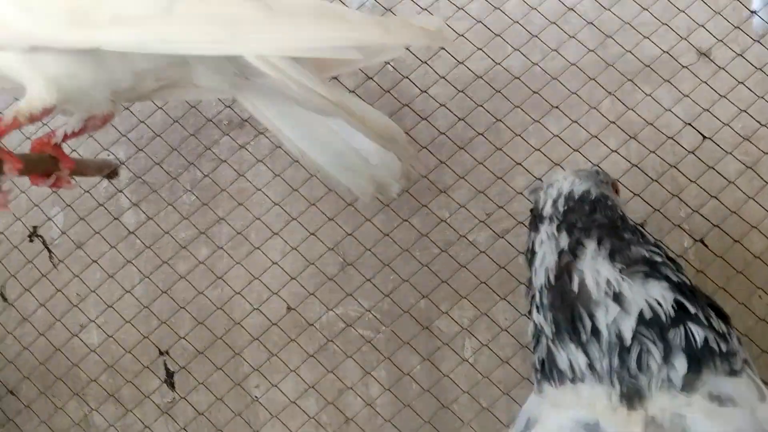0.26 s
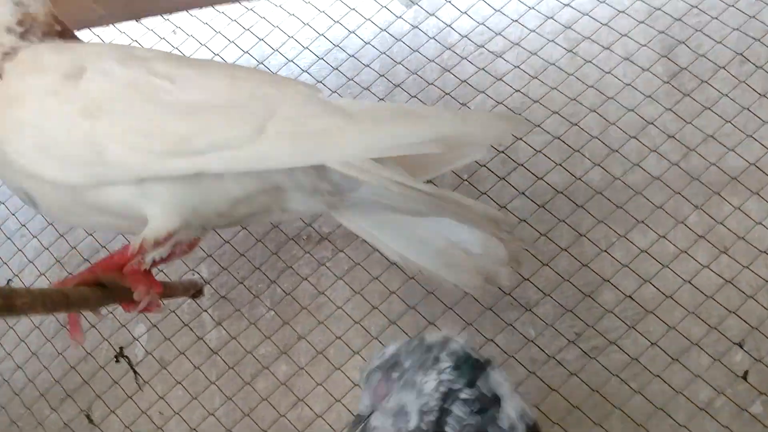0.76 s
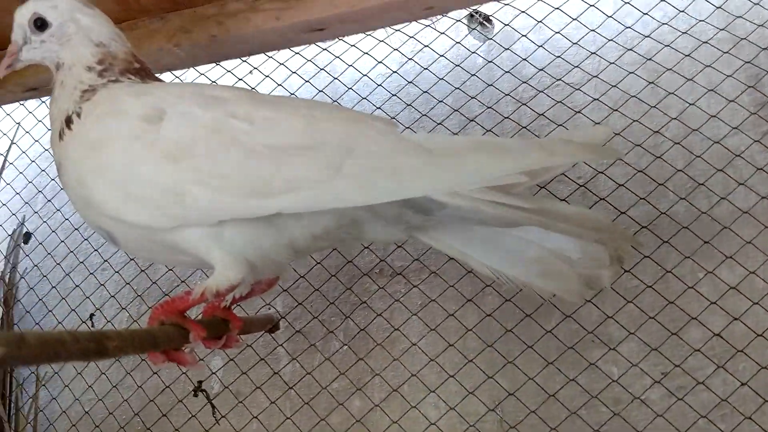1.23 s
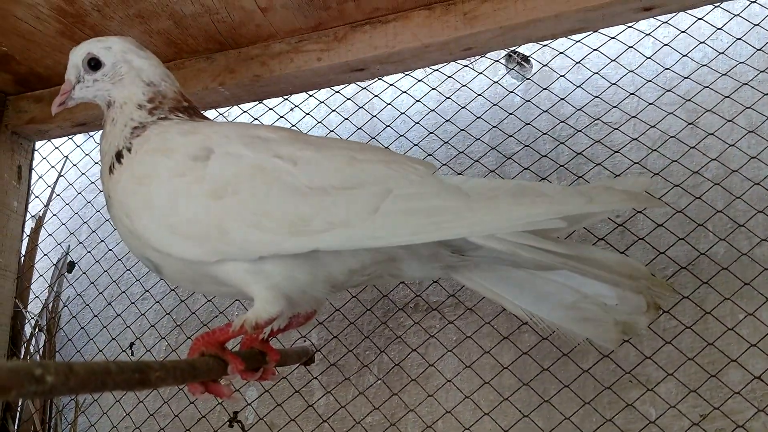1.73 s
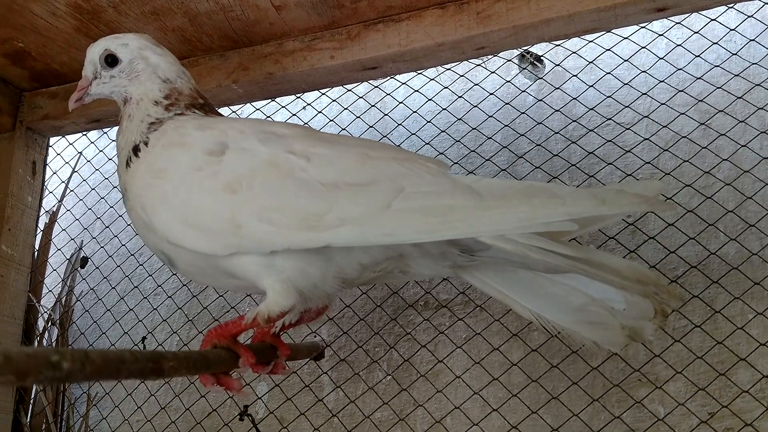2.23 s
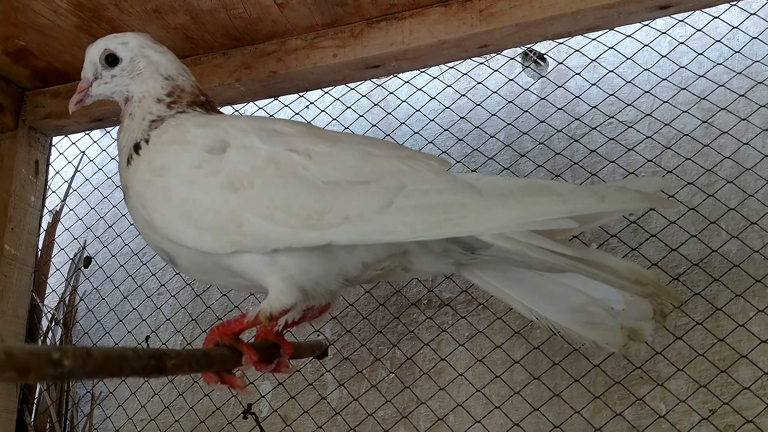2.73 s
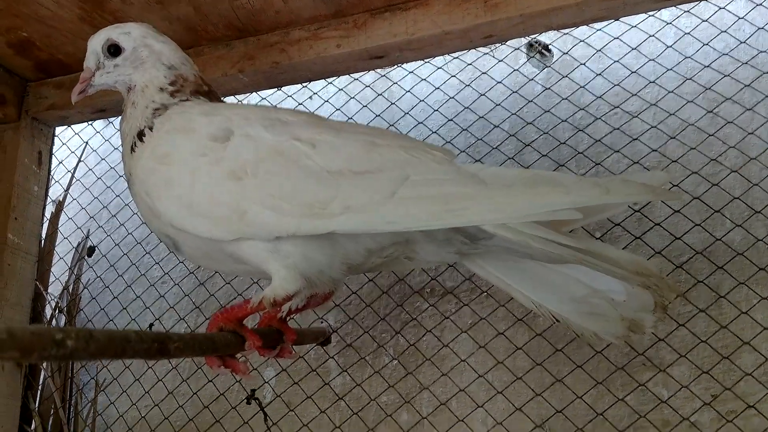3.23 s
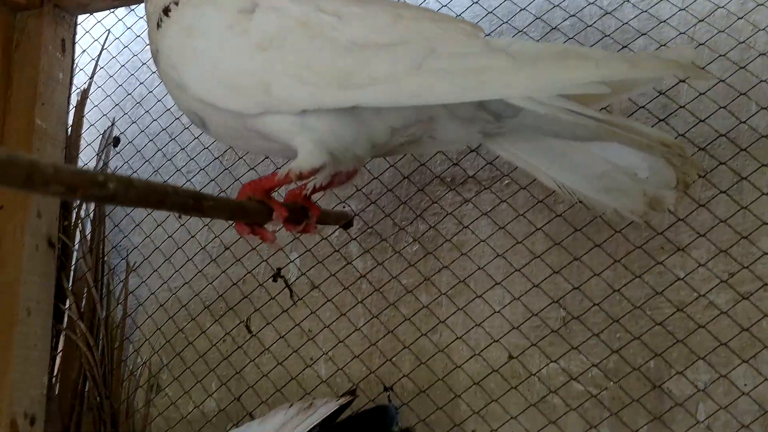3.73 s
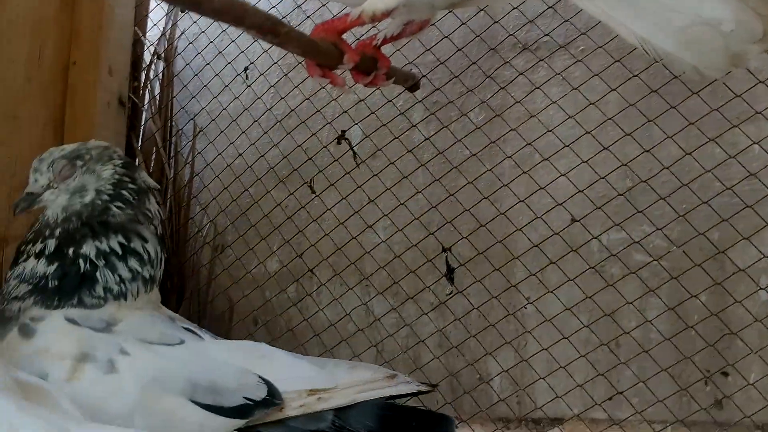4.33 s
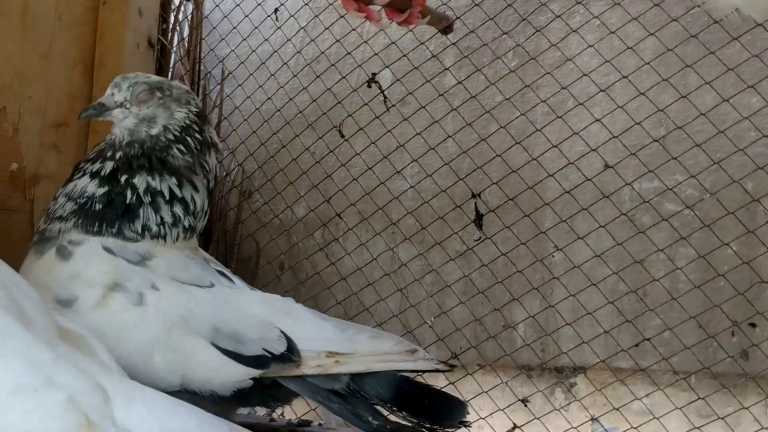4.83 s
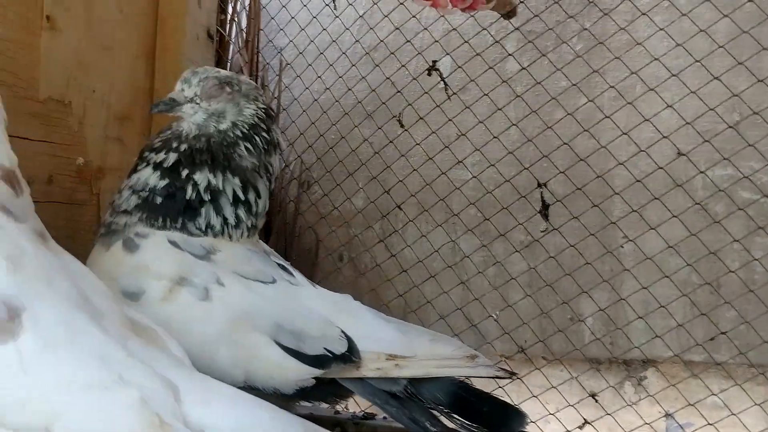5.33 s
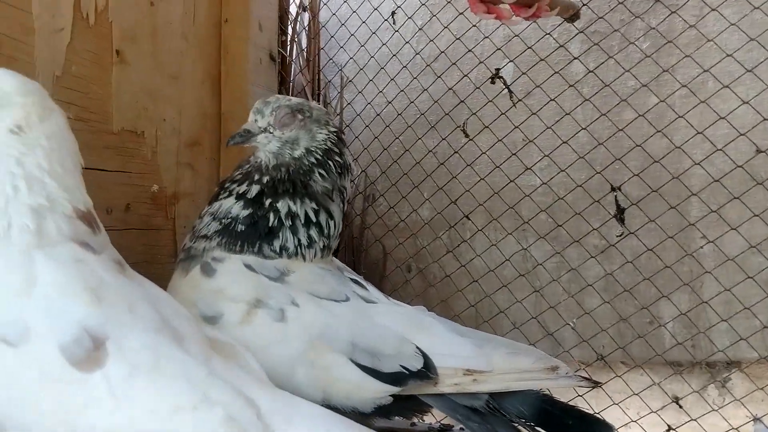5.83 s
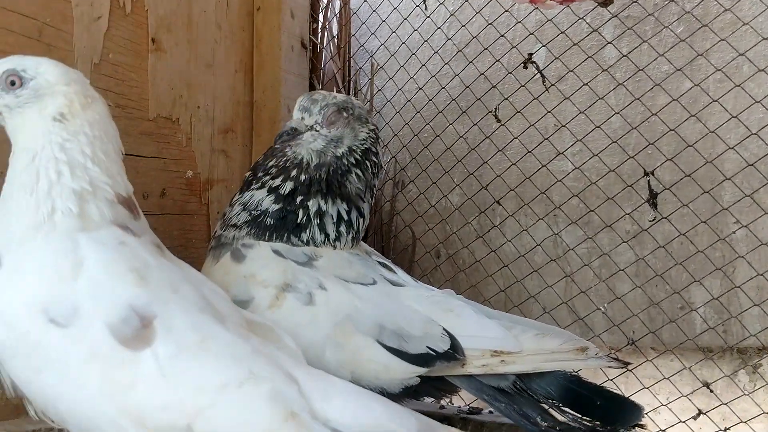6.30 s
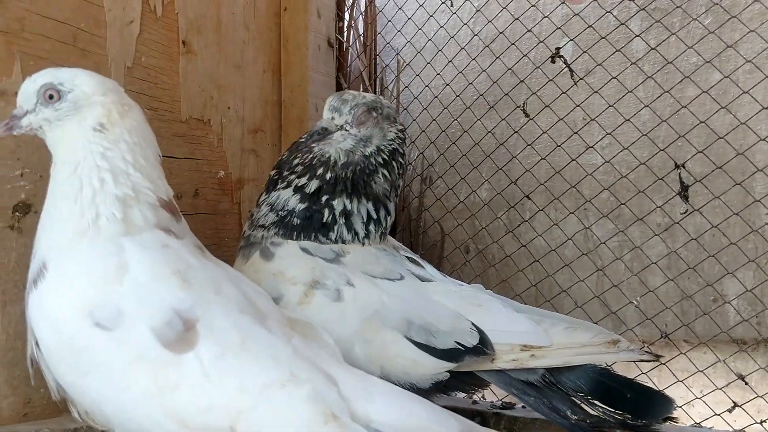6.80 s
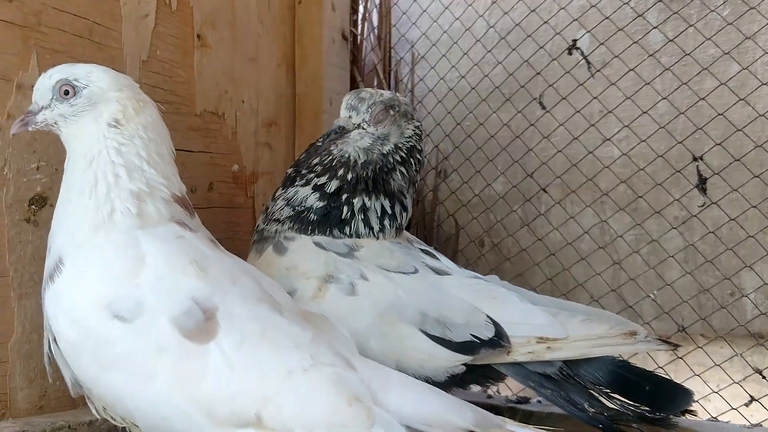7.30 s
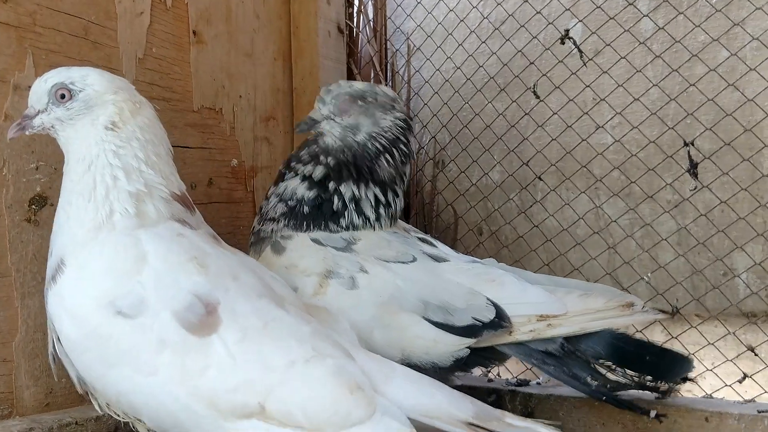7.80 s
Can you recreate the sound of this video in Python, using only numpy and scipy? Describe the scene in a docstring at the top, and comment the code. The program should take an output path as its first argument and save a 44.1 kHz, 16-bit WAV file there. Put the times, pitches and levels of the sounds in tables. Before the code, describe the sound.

Inside a small wooden loft, close to the birds. From 0 to 0.4 s low rasps and small throaty notes mix with brushing feathers and a click. A sharp wooden knock lands at 0.5 s and another at 0.8 s, with foot scuffs between. Small birds outside twitter in quick falling phrases, clearest from 0.8 to 2.1 s. Purrs at 1 to 1.25 s lead to climbing hoots from 1.4 s and a rolling coo at 1.8 s. Growls and a duller knock follow around 2.2 s, then louder hoots at 2.45 s and a coo at 2.9 s. More growls, hoots at 3.7 s and a last coo at 4.05 s end in a rasp. Then quiet low rumble and faint distant cheeps, a weak purr at 5.8 s, slight rustling near 7 s, a knock at 7.6 s and a short rasp at 7.9 s.

```python
"""Pigeons courting in a loft

Pigeons court close by in a wire-mesh loft. Drawn-out coos and short hoots are sums of harmonics
shaped by the throat; rattling growls are pulse trains that ring the crop and the beak.
Feathers brush as grainy filtered noise, and feet tick, scuff and knock as noise bursts and board modes.
Small birds twitter farther off in gliding sines, over an outdoor rumble of filtered noise and a low hum."""
import sys
import numpy as np
from scipy import signal
from scipy.fft import rfft, irfft, next_fast_len
from scipy.io import wavfile
from scipy.ndimage import map_coordinates

SR = 44100
rng = np.random.default_rng(int(sys.argv[2]) if len(sys.argv) > 2 else 0)


def int16_out(signal):
    """Quantize to a 16-bit WAV file."""
    q = np.round(np.clip(np.atleast_2d(signal).T, -1, 1) * 32767)
    wavfile.write(sys.argv[1], SR, q.astype(np.int16))


N = 355357  # length in samples


def amp(db):
    """Logarithmic level: decibels become an amplitude ratio."""
    return 10 ** (np.asarray(db) / 20)


def unit(x):
    """Normalization: scale to an rms of 1."""
    return x / np.sqrt(np.mean(x ** 2) + 1e-20)


def along(points, hz):
    """Spectral interpolation: read (Hz, value) points on a logarithmic frequency axis."""
    point_hz, values = np.transpose(points)
    return np.interp(np.log(hz + 1), np.log(point_hz + 1), values)


def clock(length):
    """Sampling: the sample times of a sound of this length, in seconds."""
    return np.arange(int(length * SR)) / SR


def add(track, start, sound):
    """Superposition: mix a sound into the track at a start time in seconds."""
    room = track[max(round(start * SR), 0):][:len(sound)]
    room += sound[:len(room)]


def wobble(rate, size=N):
    """Band-limited fluctuation: a smooth random curve with this many knots a second."""
    knots = rng.standard_normal(int(size * rate / SR) + 4)
    return map_coordinates(knots, [np.arange(size) * rate / SR])


def filtered(x, response):
    """Linear filtering: multiply the spectrum by a complex response of frequency."""
    size = next_fast_len(N + SR // 2)
    spectrum = rfft(x, size) * response(np.fft.rfftfreq(size, 1 / SR))
    return irfft(spectrum, size)[..., :N]


def coloured(x, spectrum, size=8192):
    """Minimum-phase resonance: ring x through a causal filter of unit energy."""
    cepstrum = irfft(np.log(amp(along(spectrum, np.fft.rfftfreq(size, 1 / SR)))))
    # folding the cepstrum onto positive times makes the filter causal
    cepstrum[1:size // 2] *= 2
    cepstrum[size // 2 + 1:] = 0
    ring = irfft(np.exp(rfft(cepstrum)))
    return signal.oaconvolve(x, ring / np.linalg.norm(ring))[:N]


def echo(x, decay):
    """Diffuse reverberation: convolve with a noise tail in which each frequency dies at its own speed."""
    hz, t, bins = signal.stft(rng.standard_normal(SR // 2), SR, nperseg=256)
    fading = bins * amp(-60 * t / along(decay, hz)[:, None])
    tail = signal.istft(fading, SR, nperseg=256)[1]
    return signal.oaconvolve(x, tail / np.linalg.norm(tail))[:N]


def cycles(hz):
    """Phase accumulation: integrate a pitch curve into radians."""
    return 2 * np.pi * np.cumsum(hz) / SR


def slur(length, start_hz, end_hz, waver):
    """Frequency glide: a whistled sine slides fast at first, then settles."""
    u = clock(length) / length
    hz = end_hz + (start_hz - end_hz) * (1 - u) ** 2
    hz = hz * (1 + waver * wobble(400, size=len(u)))
    return np.sqrt(2 * np.sin(np.pi * u)) * np.sin(cycles(hz))


# Held coos, one table each. Each row: time in seconds, pitch in Hz, relative levels of the
# fundamental and of the octave in dB.
COO_CURVES = [
    [(1.815, 235.5, -46, -42.5), (1.86, 269, -27.5, -30), (1.878, 261.3, -28, -34.5),
     (1.895, 274.5, -25.5, -28), (1.915, 290.7, -27.5, -26.5), (1.933, 279.6, -14, -30.5),
     (1.957, 256.2, -35.5, -31)],
    [(2.908, 275.6, -28.5, -32.5), (2.95, 280.8, -31, -34), (2.99, 304.6, -19.5, -32),
     (3.02, 308.6, -26, -34.5), (3.055, 318, -18.5, -36), (3.084, 293, -22, -30), (3.113, 265, -31.5, -48)],
    [(4.055, 281.3, -30.5, -20), (4.085, 257.4, -31.5, -29), (4.118, 274.7, -26, -23),
     (4.14, 281.2, -23.5, -21), (4.18, 263.6, -29, -29), (4.21, 297.6, -21.5, -19.5),
     (4.232, 284.5, -19.5, -29), (4.258, 247, -23, -26.5)],
]
# Throat resonance. Each row: frequency in Hz, relative harmonic strength in dB.
THROAT_RESONANCE = [(200, 3), (420, -5.5), (570, -3), (660, -7), (780, -43.5), (880, -20.5), (1050, -30),
                    (1300, -43), (2000, -48)]


def coos():
    """Harmonic source and throat resonance: a strong octave; the lower the pitch, the more it rattles."""
    out = np.zeros(N)
    for rows in COO_CURVES:
        times, *columns = np.transpose(rows)
        t = clock(times[-1] - times[0])
        hz, low_db, octave_db = (np.interp(times[0] + t, times, column) for column in columns)
        rough = np.clip((310 - hz) / 45, .3, 1)
        phase = cycles(hz * (1 + .03 * rough * wobble(220, size=len(t))))
        flutter_db = 1.6 * wobble(260, size=len(t)) + 1.8 * np.sin(2 * np.pi * 70 * t)
        rattle = amp(rough * flutter_db)
        voice = amp(low_db + 2.5) * np.sin(phase) + amp(octave_db + 3.0) * np.sin(2 * phase)
        for k in range(3, 6):
            overtone_db = octave_db + 8 - 2.1 * (k - 2) + along(THROAT_RESONANCE, k * hz)
            voice += amp(overtone_db) * np.sin(k * phase)
        fade = np.clip(np.minimum(t, t[-1] - t) / .008, 0, 1)
        add(out, times[0], voice * fade * rattle)
    return out


# Hoots, in runs that mostly climb. Each row: start in seconds, pitch in Hz, relative level in dB.
HOOT_NOTES = [(1.39, 242, -25), (1.425, 288, -19.5), (1.481, 361, -12), (1.57, 385.4, -9.5),
              (2.445, 346.4, -11), (2.505, 405, -7.5), (2.607, 391.5, -8.5), (3.672, 296, -16),
              (3.741, 358.5, -9.5)]
# Falling notes that lead into or out of a call. Each row: start in seconds, length in seconds,
# pitch in Hz, relative level in dB.
SCOOP_NOTES = [(0.167, 0.019, 224, -26.5), (0.264, 0.034, 173.8, -27), (1.737, .027, 357.5, -34),
               (2.851, .027, 371, -16.5), (4.028, 0.049, 354, -18)]
HOOT_S = 0.019  # length
HOOT_FALL, SCOOP_FALL = -.055, 0.27  # fall in pitch as a share; a hoot rises a little
HOOT_TILT_DB = -5  # step from one overtone to the next at the usual level
HOOT_BRIGHTENS, HOOT_USUAL_DB = 0.24, -11.5  # the step eases by this much per dB over the usual level


def hoots():
    """Harmonic source with an onset transient: each note snaps open a little sharp, then is choked off."""
    out = np.zeros(N)
    notes = [(start, HOOT_S, hz, HOOT_FALL, db) for start, hz, db in HOOT_NOTES]
    notes += [(start, length, hz, SCOOP_FALL, db) for start, length, hz, db in SCOOP_NOTES]
    for start, length, hz, fall, db in notes:
        t = clock(length)
        u = t / length
        snap = .25 * np.exp(-t / .002)
        phase = cycles(hz * (1 + fall * (.5 - u) + snap + .03 * wobble(400, size=len(t))))
        tilt_db = HOOT_TILT_DB + HOOT_BRIGHTENS * (db - HOOT_USUAL_DB)
        voice = np.zeros(len(t))
        for k in range(1, 5):
            voice += amp(along(THROAT_RESONANCE, k * hz) + tilt_db * (k - 1)) * np.sin(k * phase)
        add(out, start, amp(db + 6.0) * voice * np.sin(np.pi * u ** 0.6) ** 1.26)
    return out


# Thin whistles among the calls. Each row: start in seconds, length in seconds, first pitch in Hz,
# last pitch in Hz, relative level in dB.
WHISTLE_NOTES = [(1.491, 0.12, 1116, 1095, -57.5), (2.65, 0.14, 962, 880, -63),
                 (2.807, .04, 676, 625, -41.5), (2.828, 0.044, 622, 439, -36),
                 (3.775, 0.13, 1010, 970, -62), (3.873, 0.24, 980, 1020, -57.5)]


def whistles():
    """Pure-tone glides: each whistle is one sine that slides slightly or steeply."""
    out = np.zeros(N)
    for start, length, start_hz, end_hz, db in WHISTLE_NOTES:
        add(out, start, amp(db) * slur(length, start_hz, end_hz, waver=.008))
    return out


SLOWING, PULSE_JITTER = .12, .05  # sag of the pulse rate and scatter of the pulses, as shares
SWELL_SKEW, SWELL_SHAPE = 0.71, 0.53  # exponents: a growl peaks early, then runs out of air


def pulses(rows, rate, scatter_db):
    """Relaxation oscillation: uneven pulses into crop and beak swell, then slow and fade with the pressure."""
    out = np.zeros((2, N))
    for start, length, crop_db, beak_db in rows:
        chance = rng.standard_normal((24, 2))
        beat = np.arange(min(int(length * rate) + 1, len(chance)))
        late, size = chance[:len(beat)].T
        u = (beat + .5) / len(beat)
        at = start + (beat * (1 + SLOWING * (u - 1)) + PULSE_JITTER * late) / rate
        swell = np.sin(np.pi * u ** SWELL_SKEW) ** SWELL_SHAPE
        strength = np.sqrt(SR / rate) * swell * amp(scatter_db * np.tanh(size))
        spots = np.clip((at * SR).astype(int), 0, N - 1)
        out[:, spots] += strength * amp([[crop_db], [beak_db]])
    return out


# Closed-beak purrs. Each row: start in seconds, length in seconds, relative level in dB.
PURR_CALLS = [(.366, .05, -41.5), (.973, .1, -45), (1.196, .04, -28), (2.082, .095, -32.5),
              (2.24, .05, -22.5), (2.386, .035, -30.5), (3.269, .125, -31), (3.468, .038, -23.5),
              (5.775, .08, -45)]
# Open-beak rasps. Each row: start in seconds, length in seconds, relative level in dB,
# ring of the crop over the rasp in dB.
RASP_CALLS = [(0.046, .125, -41.5, 2.5), (0.172, .09, -37.5, 6.5), (1.27, .055, -38, 1.5),
              (1.977, .07, -43.5, 15.5), (2.319, .045, -43.5, 10), (3.155, .07, -39, 7),
              (3.257, .038, -44.5, -0.5), (3.529, .07, -43, 3), (3.983, .09, -37, 5), (4.263, .095, -39, 6),
              (7.91, .06, -33.5, -0.5), (7.968, .085, -41, 4)]
# Resonance of the swollen crop. Each row: frequency in Hz, relative gain in dB.
CROP_RESONANCE = [(60, -48.5), (130, -12), (180, 6.5), (240, 7), (400, 2.5), (520, -10.5), (620, -3),
                  (760, -56), (1500, -54.5), (3000, -75.5)]
# Resonance of the open beak. Each row: frequency in Hz, relative gain in dB.
BEAK_RESONANCE = [(200, -32), (450, 0), (650, 1.5), (880, 2.5), (1080, -8), (1500, -19), (2100, -24.5),
                  (3000, -19.5), (4500, -33), (15000, -51.5)]
PURR_RATE, RASP_RATE = 125, 92  # nominal pulses per second
PURR_BEAK_DB = -26.5  # leak through the closed beak
# the purr at either end of a coo: length, level going in, level over the coo's last fundamental
CREAK_S, CREAK_IN_DB, CREAK_OUT_DB = .04, -29.5, 2.5
RASP_NOISE, PUFF_T60_S = .65, .032  # air noise over the pulses, and its t60 after each pulse


def growls():
    """Pulse-excited resonance: slow pulses of the syrinx ring the crop; an open beak adds a brighter rasp."""
    creaks = [(coo[0][0] - 0.55 * CREAK_S, CREAK_S, CREAK_IN_DB) for coo in COO_CURVES]
    creaks += [(coo[-1][0] - .75 * CREAK_S, CREAK_S, coo[-1][2] + CREAK_OUT_DB) for coo in COO_CURVES]
    closed = [(start, length, db, db + PURR_BEAK_DB) for start, length, db in list(PURR_CALLS) + creaks]
    opened = [(start, length, db + crop_db, db) for start, length, db, crop_db in RASP_CALLS]
    purring = pulses(closed, PURR_RATE, scatter_db=4.5)
    rasping = pulses(opened, RASP_RATE, scatter_db=1.36)
    crop, beak = purring + rasping
    # each pulse lets out a decaying puff of noisy air
    puff = amp(-60 * clock(.04) / PUFF_T60_S)
    breath = signal.oaconvolve(beak, puff / np.linalg.norm(puff))[:N] * rng.standard_normal(N)
    return coloured(crop, CROP_RESONANCE) + coloured(beak + RASP_NOISE * breath, BEAK_RESONANCE)


def husky(voice, rasp_db):
    """Flow-modulated turbulence: air hisses through the beak on each open half of the cycle."""
    hiss = np.maximum(voice, 0) * rng.standard_normal(N)
    return voice + amp(rasp_db) * coloured(hiss, BEAK_RESONANCE)


# Shuffles, when a bird shifts and its plumage brushes. Each row: start in seconds, length in seconds,
# relative level in dB.
SHUFFLE_MOVES = [(0.06, 0.14, -54), (0.386, 0.4, -49.5), (1.133, .68, -60.5), (1.944, 0.15, -53),
                 (2.203, 0.33, -58.5), (3.16, .52, -61), (3.99, 0.31, -60.5), (5.09, .3, -64),
                 (6.941, 0.33, -61), (7.812, 0.15, -62.5)]
# Sharp clicks of claws and quills. Each row: time in seconds, relative level in dB.
TICK_HITS = [(.2698, -22.5), (.7452, -22.5), (1.9674, -32.5), (2.2233, -29), (2.2927, -26), (3.5598, -35),
             (3.8975, -33), (3.9968, -35), (4.1639, -34), (4.2667, -32.5), (6.977, -38), (7.3123, -37.5),
             (8.013, -36.5)]
# Knocks on wood, played also by knocks(). Each row: time in seconds, relative level of the crack in dB,
# relative level of the thud in dB.
KNOCK_HITS = [(0.4919, -10.5, -23), (0.5308, -55, -29), (0.8109, -16.5, -31.5), (2.2306, -28.5, -22),
              (7.5952, -20.5, -22.5), (7.617, -49, -38)]
# Plumage spectrum. Each row: frequency in Hz, relative gain in dB.
FEATHER_SPECTRUM = [(300, -10.5), (1200, 5), (2500, 2.5), (5200, 5), (8000, 0.5), (15500, -2.5)]
# Turn from shared to separate noise left and right. Each row: frequency in Hz, angle in radians.
FEATHER_WIDTH = [(3000, 0.042), (5500, .35), (8000, 0.74), (15000, 1)]
STILL_DB = -69.5  # relative brushing of birds at rest
SHUFFLE_RISE, SHUFFLE_RELEASE_S = .2, 0.086  # rise as a share of the length, centred on the start; decay
QUILL_RATE, QUILL_DB, QUILL_SPREAD_DB = 22, 8.5, 8  # random ticks: mean per s, level over motion, scatter
KNOCK_TICK_DB = -13.5  # click of the claw in a knock, against its crack
TICK_RISE_S, TICK_T60_S = 0.00083, 0.013


def feathers():
    """Friction noise: grainy brushing in stereo, with random ticks that grow with the motion and set clicks."""
    now = np.arange(N) / SR
    motion = np.full(N, amp(STILL_DB))
    for start, length, db in SHUFFLE_MOVES:
        rise = np.clip((now - start) / (SHUFFLE_RISE * length) + .5, 0, 1)
        fall = np.exp(-np.maximum(now - start - length, 0) / SHUFFLE_RELEASE_S)
        motion = np.maximum(motion, amp(db) * rise * fall)
    grain = unit(amp(2.85 * wobble(700) + 4.06 * wobble(55)))
    brush = amp(3.5) * motion * grain
    quills = rng.random(N) < QUILL_RATE / SR
    contacts = quills * motion * amp(QUILL_DB + QUILL_SPREAD_DB * rng.standard_normal(N))
    claws = [(start, crack_db + KNOCK_TICK_DB) for start, crack_db, thud_db in KNOCK_HITS]
    for start, db in list(TICK_HITS) + claws:
        add(contacts, start, [amp(db + 1.5)])
    t = clock(.03)
    tick = amp(-60 * t / TICK_T60_S) * (1 - np.exp(-t / TICK_RISE_S))
    strength = np.hypot(brush, signal.oaconvolve(contacts, tick)[:N])
    noises = rng.standard_normal((3, N))
    shared, *own = (coloured(strength * noise, FEATHER_SPECTRUM) for noise in noises)
    middle = filtered(shared, lambda hz: np.cos(along(FEATHER_WIDTH, hz)))
    sides = filtered(np.array(own), lambda hz: np.sin(along(FEATHER_WIDTH, hz)))
    return middle + sides


# Feet scraping the perch. Each row: time in seconds, relative level in dB.
SCUFF_HITS = [(.585, -37), (.611, -34), (.696, -40), (.868, -40), (1.79, -35.5), (2.296, -43), (5.658, -46),
              (7.081, -48.5), (7.453, -45)]
# Modes of the loft boards. Each row: frequency in Hz, relative level in dB, t60 in seconds.
BOARD_MODES = [(178.3, -1, 0.081), (245, -3, 0.051), (376, 7, 0.022), (597, -8.5, 0.029),
               (1020, -1.5, 0.0087)]
# Spectrum of the sharp contact. Each row: frequency in Hz, relative gain in dB.
CRACK_SPECTRUM = [(300, 11), (800, 15), (1500, 2), (2500, 0), (4000, 1), (7000, -4.5), (15000, -14.5)]


def knocks():
    """Impact and modal ringing: a sharp contact, then dull board modes; scuffs decay more slowly than cracks."""
    cracks, thuds, scuffs = np.zeros((3, N))
    t = clock(0.35)
    snap = amp(-60 * t / .02) * (1 - np.exp(-t / .0005))
    for start, crack_db, thud_db in KNOCK_HITS:
        add(cracks, start, amp(crack_db - 1.5) * snap * rng.standard_normal(len(t)))
        ring = np.zeros(len(t))
        for hz, db, t60 in BOARD_MODES:
            ring += amp(db + rng.normal(0, 1.6) - 60 * t / t60) * np.sin(2 * np.pi * hz * t)
        add(thuds, start, amp(thud_db + 3.5) * ring * (1 - np.exp(-t / 0.0025)))
    for start, db in SCUFF_HITS:
        add(scuffs, start - .003, amp(db - 60 * t / 0.077) * rng.standard_normal(len(t)))
    scrape = coloured(scuffs, [(300, -3.0), (1200, 3.5), (2200, -20.5), (12000, -27.5)])
    return coloured(cracks, CRACK_SPECTRUM) + thuds + scrape


# Songs, the phrase repeated evenly. Each row: start in seconds, number of phrases, period in seconds,
# relative level of the first in dB, fade per phrase in dB, direct share from 0 to 1.
SONG_RUNS = [(.301, 2, 0.26, -49.5, 4.5, 0.39), (.781, 6, .235, -42.5, 2, 0.88),
             (2.3, 2, 0.22, -54, 10.5, 0.7), (2.775, 1, 0.2, -59, 0, 0.31), (3.075, 3, .26, -55.5, .5, .2),
             (4.561, 2, .27, -60, 2.5, .2), (5.63, 1, .24, -63, 0, 0.07), (6.24, 1, 0.2, -63, 0, 0.03),
             (6.56, 2, .2, -65.5, -5, 0.15)]
# Notes of the twitter phrase. Each row: delay in seconds, length in seconds, first pitch in Hz,
# last pitch in Hz, relative level in dB.
PHRASE_NOTES = [(0, 0.032, 3950, 3380, 2), (.035, .028, 3950, 3380, 3.5), (.066, .02, 4080, 3820, 2.5),
                (.085, .056, 3850, 3100, -1.5)]
# Single cheeps. Each row: start in seconds, first pitch in Hz, relative level in dB.
CHEEP_NOTES = [(4.197, 3607, -55), (4.353, 4070, -57.5), (4.46, 3640, -57), (4.995, 3740, -57),
               (5.92, 3900, -62.5)]
# Reverberation of the yard. Each row: frequency in Hz, t60 in seconds.
YARD_DECAY = [(1000, 0.5), (8000, 0.12)]
CHEEP_S, CHEEP_FALL_HZ = .06, 173  # length and fall


def small_birds():
    """Direct-to-reverberant ratio: falling notes, the farther ones mostly as echoes of the yard."""
    near, far = np.zeros((2, N))
    for start, phrases, period, db, fade_db, direct in SONG_RUNS:
        direct = np.clip(direct, 0, .95)
        for k in range(round(phrases)):
            for delay, length, start_hz, end_hz, note_db in PHRASE_NOTES:
                shift = 1 + 0.0088 * rng.standard_normal()
                note = slur(length, start_hz * shift, end_hz * shift, waver=0.015)
                note = amp(db - k * fade_db + note_db) * note
                at = start + k * period + delay
                add(near, at, direct * note)
                add(far, at, np.sqrt(1 - direct ** 2) * note)
    for start, hz, db in CHEEP_NOTES:
        add(far, start, amp(db) * slur(CHEEP_S, hz, hz - CHEEP_FALL_HZ, waver=0.027))
    return near + echo(far, YARD_DECAY)


def distant_flock(level_db):
    """Reverberant field: faint falling notes at random moments, blurred by the yard."""
    out = np.zeros(N)
    for when, pitch, length, size in rng.random((110, 4)):
        top_hz = 3350 + 650 * pitch
        note = slur(.03 + .04 * length, top_hz, top_hz - 420, waver=.025)
        add(out, .3 + 6.6 * when, amp(level_db - 8 * size) * note)
    return echo(out, YARD_DECAY)


# Spectrum of the outdoor rumble. Each row: frequency in Hz, relative gain in dB.
RUMBLE_SPECTRUM = [(20, -39), (45, -15.5), (65, 0.5), (100, 0), (170, 1), (300, -9), (500, -10), (600, -8),
                   (750, -16), (1250, -19.5), (2000, -23), (2600, -27.5), (4000, -29.5), (15000, -41.5)]
# Course of the rumble. Each row: time in seconds, relative level in dB.
RUMBLE_COURSE = [(0.0, -44), (0.49, -50.5), (6.69, -53), (8.06, -51)]


def outdoors():
    """Filtered noise and a modulated tone: distant rumble with a low, wavering hum."""
    level_db = np.interp(np.arange(N) / SR, *np.transpose(RUMBLE_COURSE))
    rumble = amp(level_db + 3 + 1.6 * wobble(9)) * coloured(rng.standard_normal(N), RUMBLE_SPECTRUM)
    hum = np.sin(cycles(66.5 + 2 * wobble(10))) * amp(2.2 * wobble(5))
    return rumble + amp(-57.5) * hum


# Phase between left and right. Each row: frequency in Hz, lead of the left in radians.
LEFT_LEAD = [(60, -2.3), (160, -.9), (260, .4), (400, 1), (580, -1.8), (800, -.8), (1100, -.1), (1500, -.5),
             (1800, -2.3), (2160, -np.pi)]
# Strength of left over right. Each row: frequency in Hz, difference in dB before the tilt factor.
LEFT_BALANCE = [(160, 0), (280, 2), (400, 4.5), (600, 9), (850, 1), (1500, -2), (2500, 0), (6500, -1),
                (10500, -9)]
OPPOSITION_HZ = 2160  # left and right are in opposition here and at every multiple


def stereo_filter(x, tilt):
    """Stereo filter: left and right differ in phase and strength from one frequency to the next."""
    side = np.array([[.5], [-.5]])  # half the difference goes to each channel, with opposite signs

    def response(hz):
        """Complex transfer function: gain and phase of both channels."""
        steady_turn = 2 * np.pi * np.maximum(hz / OPPOSITION_HZ - 1, 0)
        lead = np.interp(hz, *np.transpose(LEFT_LEAD)) - steady_turn
        return amp(side * tilt * along(LEFT_BALANCE, hz)) * np.exp(1j * side * lead)

    return filtered(x, response)


# Reverberation of the loft. Each row: frequency in Hz, t60 in seconds.
LOFT_DECAY = [(150, 0.41), (400, 0.18), (1000, 0.1), (4000, 0.021), (15000, 0.13)]
SLAP_S, SLAP_DB = .037, -25.5  # the far wall throws the voices back: delay, level
WALL_VOICE_DB, WALL_MOVEMENT_DB, WALL_YARD_DB = -21.5, -10, -15  # what the walls scatter of each source


def scene():
    """Superposition of fields: close pigeons, the loft's answer, the yard and a two-channel hiss."""
    voices = husky(coos(), rasp_db=-23) + husky(hoots() + whistles(), rasp_db=-23) + growls()
    voices = voices + amp(SLAP_DB) * filtered(voices, lambda hz: np.exp(-2j * np.pi * hz * SLAP_S))
    movement = knocks() + feathers()
    yard = small_birds() + distant_flock(level_db=-60.5) + outdoors()
    scattered = amp(WALL_VOICE_DB) * voices + amp(WALL_MOVEMENT_DB) * movement + amp(WALL_YARD_DB) * yard
    walls = np.array([echo(side, LOFT_DECAY) for side in scattered])
    hiss = amp(-74) * rng.standard_normal((2, N))
    close = stereo_filter(voices + amp(-20.5) * echo(voices, LOFT_DECAY), tilt=0.95)
    around = stereo_filter(movement + hiss + walls, tilt=0.8)
    return close + around + stereo_filter(yard, tilt=.1)


def record(dry):
    """Band limiting: nothing is kept from 15900 Hz up."""
    return filtered(dry, lambda hz: hz < 15900)


dry = scene()
out = record(dry)
int16_out(out)
```